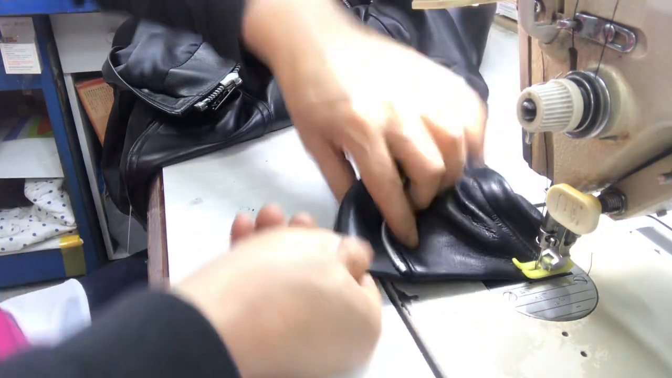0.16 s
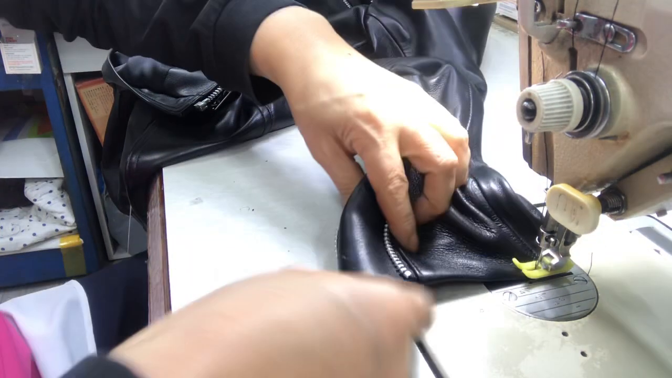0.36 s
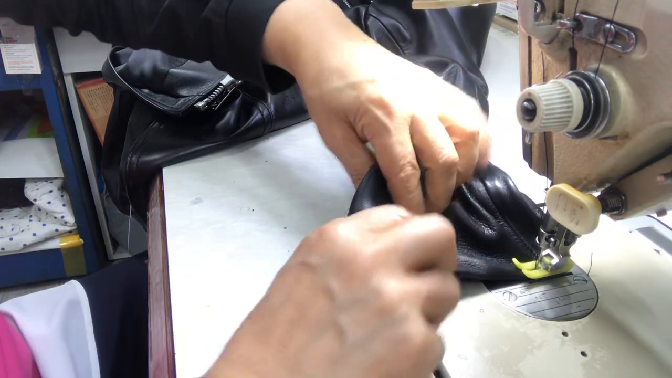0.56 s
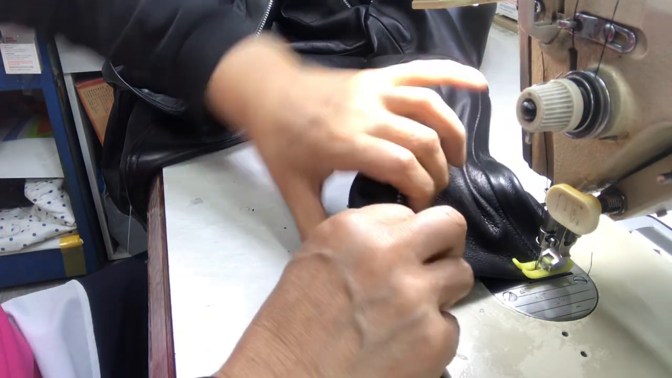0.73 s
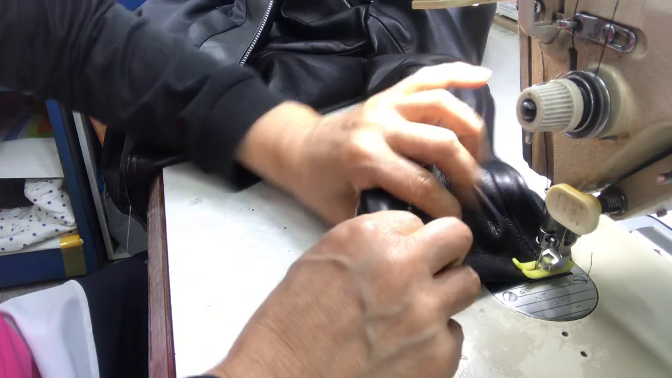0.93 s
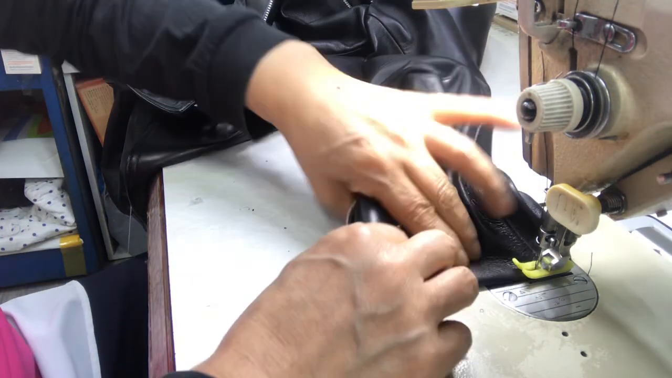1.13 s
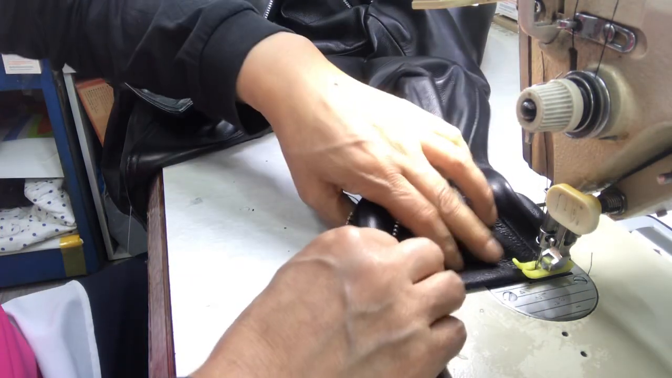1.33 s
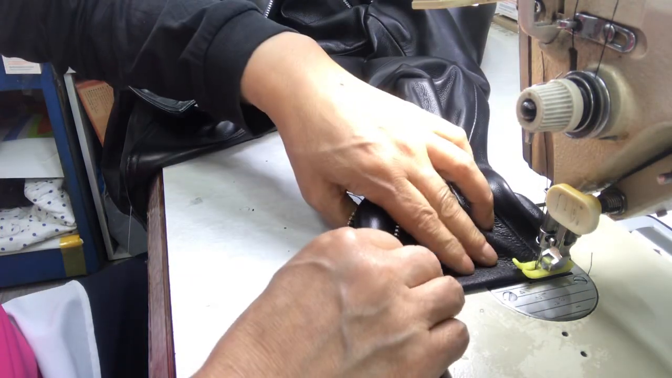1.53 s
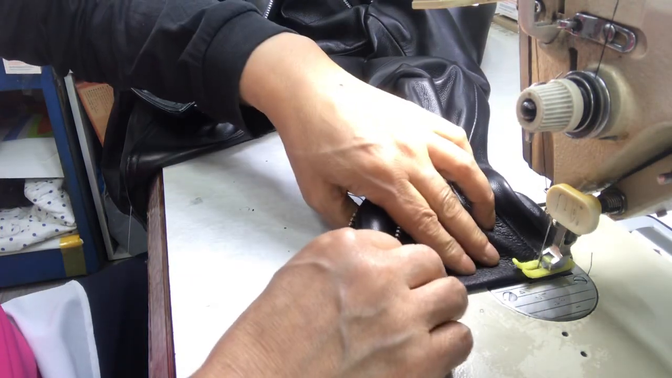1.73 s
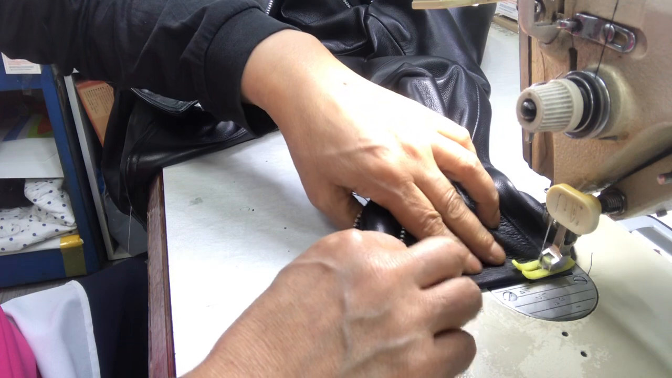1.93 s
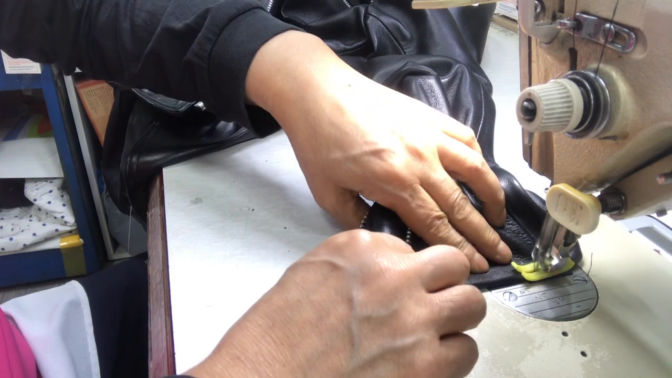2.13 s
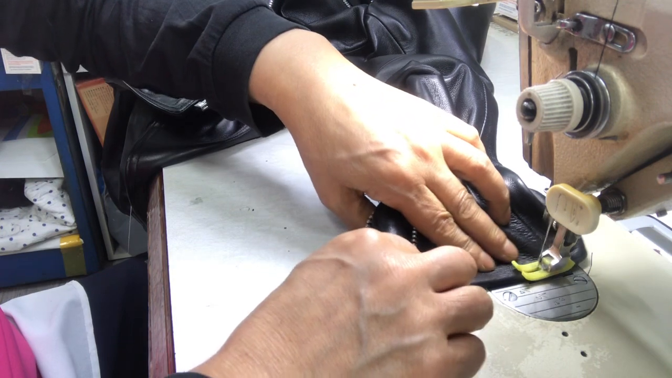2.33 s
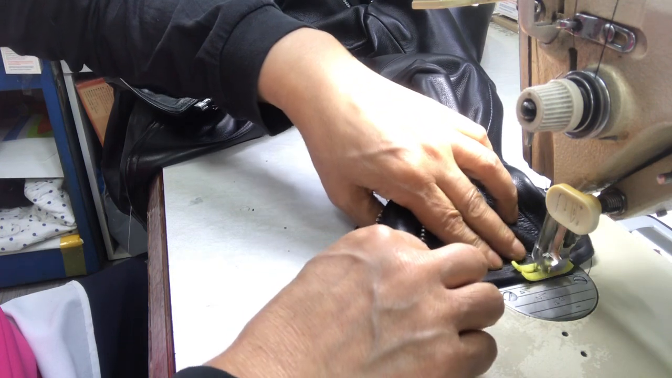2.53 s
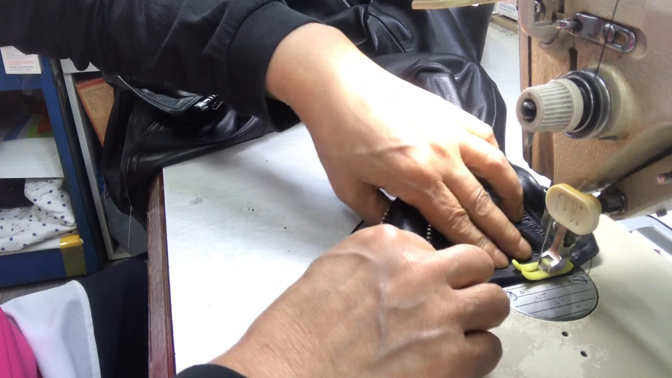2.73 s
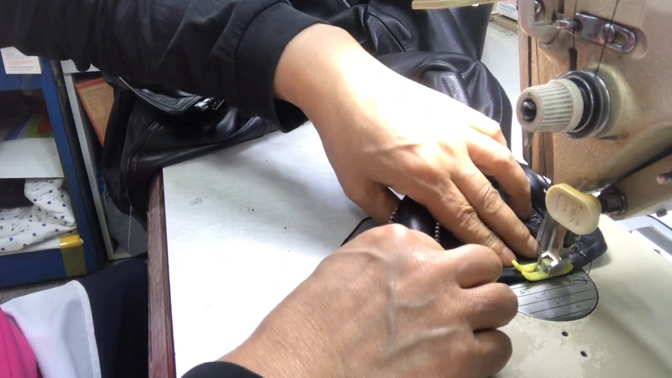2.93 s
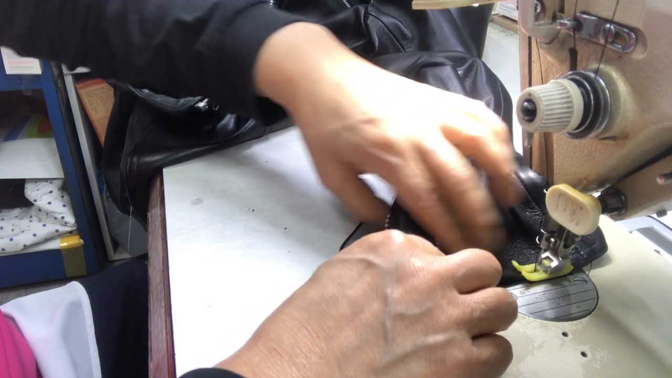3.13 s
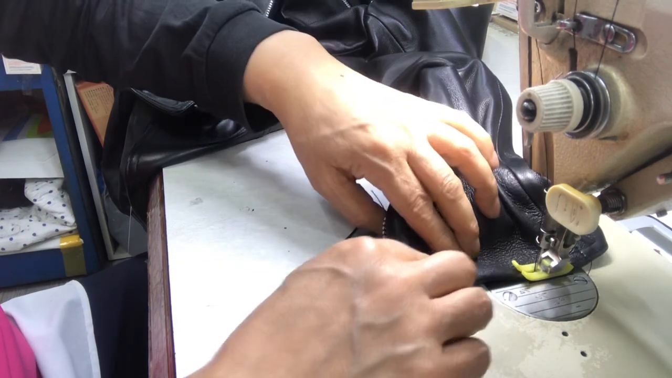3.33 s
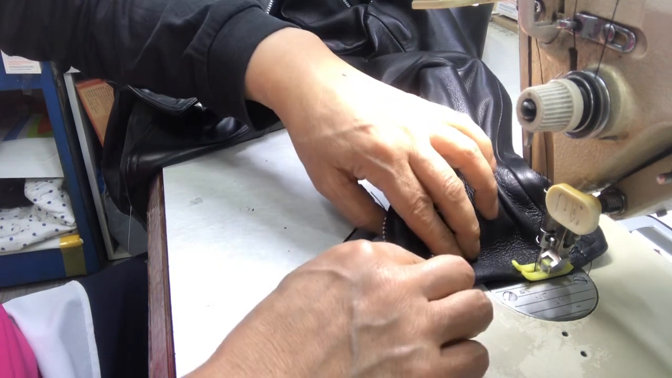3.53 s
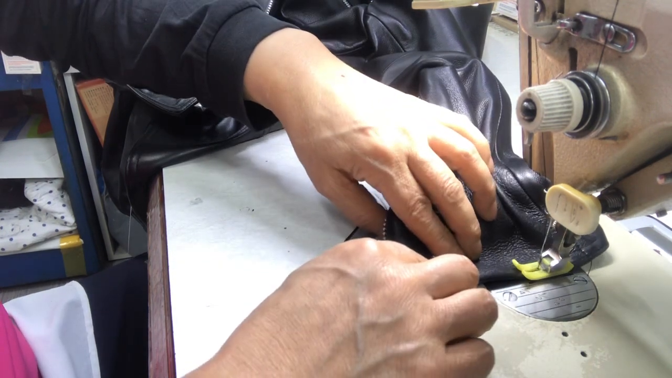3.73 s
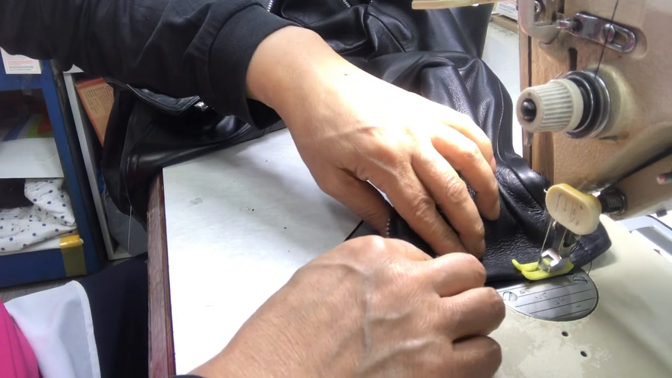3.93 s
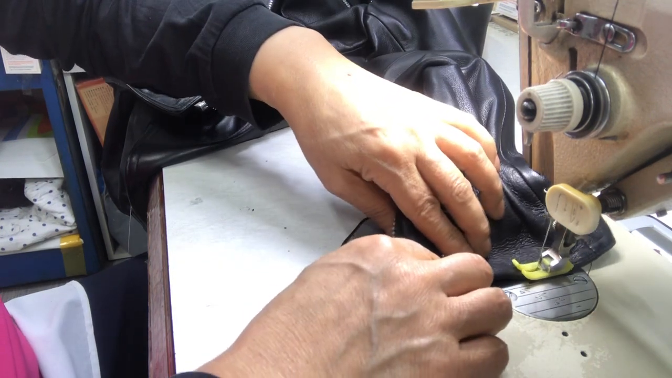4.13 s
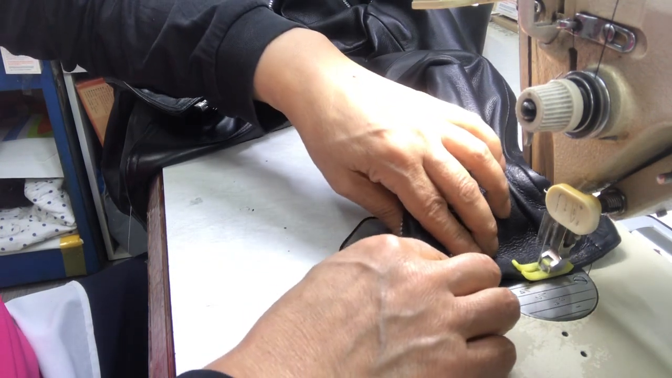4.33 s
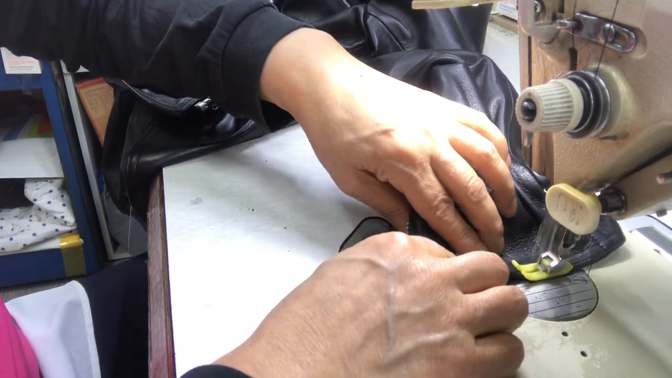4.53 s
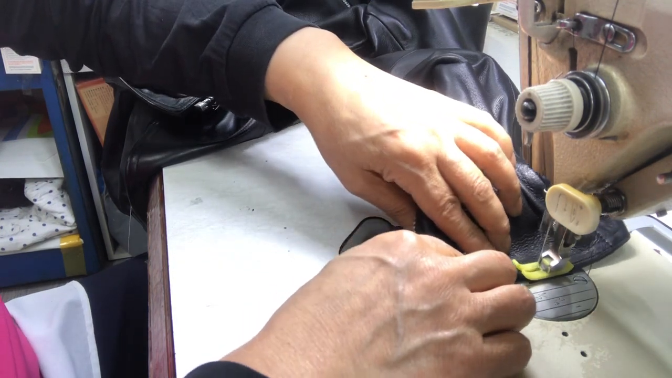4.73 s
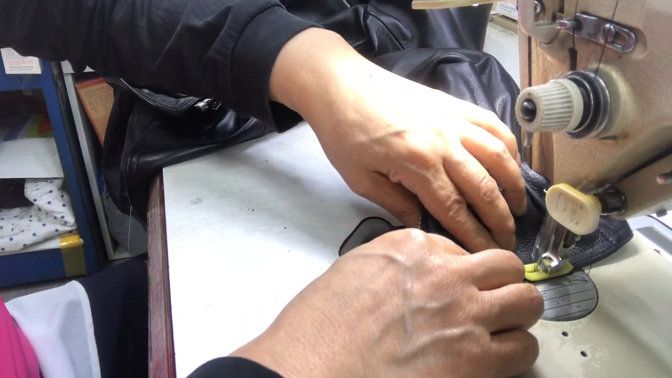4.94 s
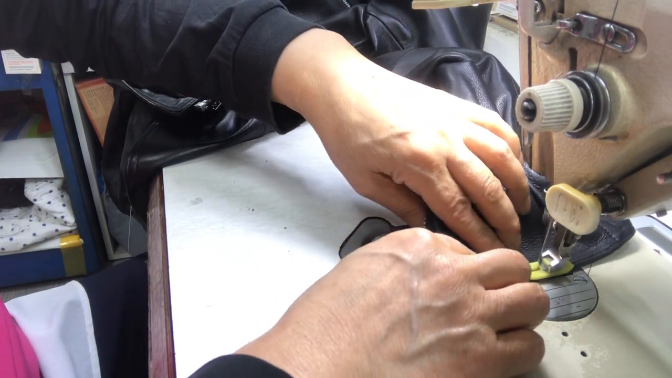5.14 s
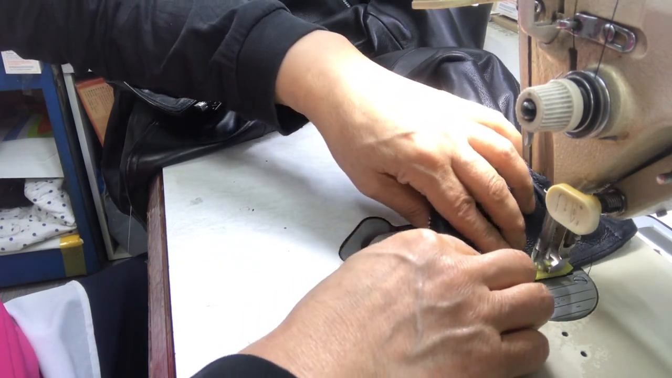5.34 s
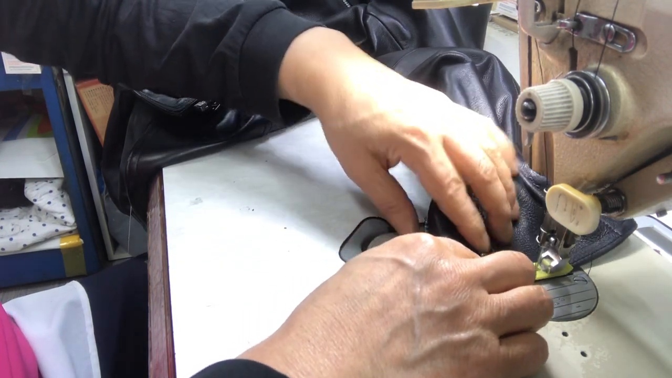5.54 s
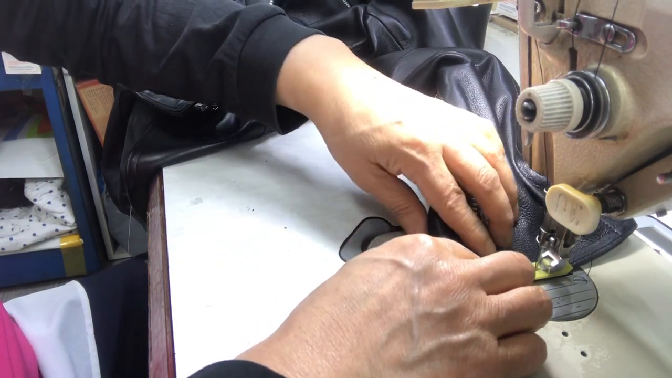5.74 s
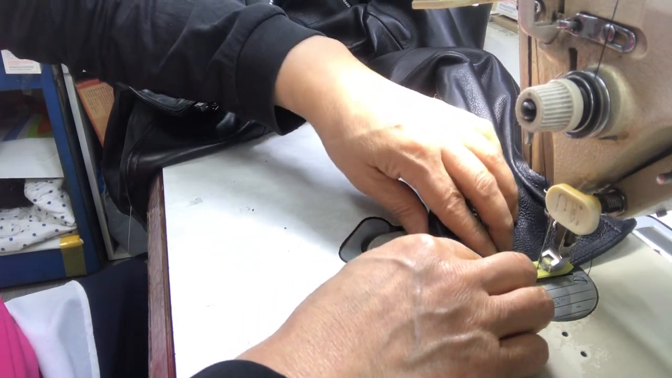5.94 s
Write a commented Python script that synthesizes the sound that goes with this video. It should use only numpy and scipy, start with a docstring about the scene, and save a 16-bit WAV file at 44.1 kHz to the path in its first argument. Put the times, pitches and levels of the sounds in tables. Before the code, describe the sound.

For the first 1.7 seconds, thick leather is handled close by, with soft rustling and irregular crackles, the sharpest near 0.9 seconds. At 1.7 a clutch clicks and an industrial sewing machine starts. From 1.9 to 3.1 it makes nine loud stitches, quickly reaching about seven a second. Each joins a low table thump, a ringing metallic clack and a bright rattle, over a faint gear whirr. It stops with a tiny brake squeak, light clunks and ticks. The leather rustles quietly, then the clutch clicks again at 3.7. A second run of eleven stitches lasts from 3.9 to 5.4, starting slower and speeding up, and ends with another faint squeak and ticks. A little rustling follows, with a last clutch click near 5.9. A low workshop rumble lies underneath throughout, and the reverberation is short and dull.

```python
"""An industrial sewing machine makes two short runs through thick leather, heard close by in a workshop.
Each stitch is a series of impacts: the table thumps, needle and foot excite the modes of the casting,
the hook rattles and small parts tick. The clutch clicks in, the gears whirr, and brake friction squeaks.
Handled leather crackles and rustles; behind it lie a short reverberation and a low room rumble."""
import sys
import numpy as np
from scipy import signal
from scipy.fft import rfft, irfft, next_fast_len
from scipy.io import wavfile
from scipy.ndimage import map_coordinates

SR = 44100
rng = np.random.default_rng(int(sys.argv[2]) if len(sys.argv) > 2 else 0)


def store_wav(level_fs):
    """Save 16-bit WAV to argv[1]."""
    pcm = np.round(np.clip(np.atleast_2d(level_fs), -1, 1) * 32767)
    wavfile.write(sys.argv[1], SR, pcm.T.astype(np.int16))


N = 263718

# stitches, one list per run: (hook time [s], thump time [s], foot time [s], feed level [dB],
# hook level [dB], take-up level [dB], thump level [dB], needle level [dB], foot level [dB])
STITCH_RUNS = [
    [(1.8577, 1.9231, 1.9651, -23, -20, -19, -28, -20, -17.5),
     (2.034, 2.0877, 2.1141, -35, -34, -21, -21, -17.5, -14),
     (2.177, 2.2244, 2.2487, -45, -16, -17.5, -20, -23.5, -15),
     (2.3117, 2.361, 2.385, -30, -15.5, -18.5, -20.7, -24, -16),
     (2.451, 2.4979, 2.5219, -28, -15.5, -22, -21, -19.5, -15),
     (2.5878, 2.636, 2.6589, -32, -17, -18, -22.5, -24, -15.5),
     (2.724, 2.771, 2.796, -26, -16, -18.5, -22, -24.5, -15),
     (2.8604, 2.908, 2.9326, -31, -15, -23, -21.5, -21.5, -15.5),
     (2.9964, 3.0766, 3.0828, -47, -16.5, -20.5, -32, -55, -18.5)],
    [(3.8585, 3.9298, 3.9725, -29, -18.5, -23.5, -29, -26.5, -20.5),
     (4.063, 4.122, 4.1613, -24, -16.5, -21, -28, -61, -21.5),
     (4.249, 4.297, 4.34, -23.5, -17, -21.5, -27, -35, -19.5),
     (4.416, 4.466, 4.4919, -24, -16.5, -16.5, -23, -29.5, -14.5),
     (4.555, 4.604, 4.6292, -23, -18, -21, -23, -23, -16.5),
     (4.6946, 4.7414, 4.767, -45, -14.5, -17.5, -23.3, -26.5, -14),
     (4.831, 4.8782, 4.9015, -31, -17.5, -20.5, -23.4, -22.5, -14),
     (4.9666, 5.0145, 5.039, -32, -16.5, -21, -23, -23, -14),
     (5.1045, 5.1511, 5.1749, -23.5, -18, -18, -23, -24, -16),
     (5.2406, 5.2885, 5.3133, -26, -17.5, -20, -22.5, -16.5, -14),
     (5.3792, 5.4197, 5.4131, -26, -15.5, -45, -28.5, -60, -23.5)],
]
FEED_AT = .65  # share of the way from the previous foot contact to the hook
TAKEUP_AT, NEEDLE_AT = .41, .753  # shares of the way from hook to foot
WINDUP_S = 0.22  # the shaft creeps this long before a run's first hook

def stitches():
    """Kinematic linkage: one shaft times every contact. Gives (time [s], level [dB]) for each part."""
    hook_s, thump_s, foot_s, *levels = np.transpose(np.concatenate(STITCH_RUNS))
    start_s = np.concatenate([np.r_[run[0][0] - WINDUP_S, np.transpose(run)[2][:-1]]
                              for run in STITCH_RUNS])
    feed_s = start_s + FEED_AT * (hook_s - start_s)
    takeup_s = hook_s + TAKEUP_AT * (foot_s - hook_s)
    needle_s = hook_s + NEEDLE_AT * (foot_s - hook_s)
    times = dict(feed=feed_s, hook=hook_s, takeup=takeup_s, thump=thump_s, needle=needle_s, foot=foot_s)
    return {part: np.array([s, db]) for (part, s), db in zip(times.items(), levels)}


def brake_damping(last_db=-9.5):
    """Damping: the brake weakens the ring of each run's last stitch. Gives a gain [dB] per stitch."""
    return np.concatenate([last_db * (np.arange(len(run)) == len(run) - 1) for run in STITCH_RUNS])


def table_thumps():
    """Forced vibration: the table swings, longer when hit harder, and recoils as the foot lands."""
    track, parts = np.zeros(N), stitches()
    t = np.arange(-SR // 25, SR // 25) / SR
    for s, db in parts["thump"].T:
        width = np.where(t < 0, .0085, .0095) * amp(.4 * (db + 16))
        envelope = np.exp(-np.abs(t / width) ** 1.73 / 2)
        add(track, s + t[0], amp(db - 1.7) * envelope * np.cos(2 * np.pi * 131 * t))
    recoil = -np.exp(-(t / np.where(t < 0, .004, .014)) ** 2 / 2) * np.cos(2 * np.pi * 128 * t)
    recoil_delay_s, recoil_db = 0.0066, -14.5
    for (s, db), damping_db in zip(parts["foot"].T, brake_damping()):
        add(track, s + recoil_delay_s + t[0], amp(db + recoil_db + damping_db) * recoil)
    return track


# modes of casting and table: (frequency [Hz], level [dB], T60 [s], rise time [s])
BODY_MODES = [(245.4, 4.5, 0.078, 0.0039), (353.9, 7.5, 0.088, 0.0073), (461.6, 6, 0.048, 0.0046),
              (577.8, 0, 0.09, 0.0024), (619.6, 2.5, 0.066, 0.0013), (697.6, 0, 0.051, 0.0015),
              (737, -6.5, 0.043, 0.00096), (1057, -6, 0.056, 0.00065), (1252, -12, 0.081, 0.0018),
              (1380, -0.5, 0.023, 0.00099), (1598, -4.5, 0.057, 0.00068), (1943, -9.5, 0.079, 0.0013),
              (2054, -8.5, 0.086, 0.0012), (2146, -11.5, 0.086, 0.00067), (2670, -13, 0.06, 0.0017)]
# spectrum of a blow's crack: (frequency [Hz], level [dB])
CRACK_SPECTRUM = [(700, -3.5), (1300, 4.5), (2200, -1.5), (4000, 0.5), (6300, -2.5), (9000, -17.5),
                  (12000, -19.5), (14000, -24.5), (16000, -31)]
RING_FOLLOWS = 0.32  # dB of low-mode ring per dB of blow

def needle_and_foot():
    """Impact excitation: a blow cracks and rings the head; the lower bed and table modes build later."""
    track, parts = np.zeros(N), stitches()
    hz, mode_db, t60, rise = np.transpose(BODY_MODES)
    for part, usual_db, bed_db, table_db in [("needle", -23, -32.5, -37), ("foot", -15, -30, -31)]:
        for (s, db), damping_db in zip(parts[part].T, brake_damping()):
            low_db = RING_FOLLOWS * (db - usual_db) + damping_db
            head_db = db - 12.5
            drive_db = np.select([hz < 450, hz < 700], [table_db + low_db, bed_db + low_db], head_db)
            add(track, s, ring(hz, mode_db + drive_db, t60, rise))
    s, db = np.hstack([parts["needle"], parts["foot"]])
    crack = strokes(s, db - 8.5, rise=0.00037, t60=0.035)
    tail = strokes(s, db - 27.5, rise=0.0016, t60=0.09)
    return track + (crack + tail) * noise(CRACK_SPECTRUM)


# spectrum of the hook's rattle: (frequency [Hz], level [dB])
RATTLE_SPECTRUM = [(300, 4), (1000, -0.5), (2200, 6), (4000, 8), (6000, 3), (9000, 0), (16000, -17)]

def hook():
    """Friction and chatter: the hook scrapes in, takes the thread and rattles on."""
    s, db = stitches()["hook"]
    scrape = strokes(s, db - 24.5, rise=0.0013, t60=0.083, lead=0.0069)
    catch = strokes(s, db - 17, rise=0.0018, t60=0.048)
    return (scrape + catch) * amp(1.53 * wobble(600)) * noise(RATTLE_SPECTRUM)


# loose parts ticking as the machine starts and stops: (time [s], level [dB], T60 [s])
LOOSE_TICKS = [(1.721, -28.5, 0.024), (1.7486, -17.5, 0.027), (1.7754, -39, 0.1), (1.842, -30, 0.045),
               (1.8495, -20, 0.038), (3.045, -17.5, .035), (3.0994, -42, 0.082), (3.117, -32, 0.048),
               (3.126, -27, 0.022), (3.1612, -37, 0.025), (3.173, -36, 0.04), (3.1978, -36, 0.031),
               (3.206, -35, 0.049), (3.638, -35, 0.092), (3.774, -30.5, 0.15), (3.8267, -37, 0.088),
               (3.8493, -22, 0.026), (4.3098, -24, 0.067), (5.445, -24.5, 0.051), (5.472, -27.5, 0.17),
               (5.497, -29, 0.062), (5.5485, -27.5, 0.013)]
# spectrum of a light contact: (frequency [Hz], level [dB])
TICK_SPECTRUM = [(1200, -38), (2600, -7), (4000, 7), (6000, 3), (8000, -4.5), (12000, -8.5), (16000, -20.5)]

def ticks():
    """Light impacts: loose parts, feed and take-up each radiate a bright burst over a duller one."""
    parts = stitches()
    # (time [s], level [dB], dull offset [dB], T60 [s])
    rows = [(s, db, -4.5, t60) for s, db, t60 in LOOSE_TICKS]
    rows += [(s, db, -2.3, 0.044) for s, db in parts["feed"].T]
    rows += [(s, db, -8.5, 0.087) for s, db in parts["takeup"].T]
    s, db, dull_db, t60 = np.transpose(rows)
    dull = noise([(400, -19), (900, -6), (2200, -0.5), (3500, -29)])
    bright = strokes(s, db - 17, rise=0.00041, t60=t60) * amp(3.3 * wobble(700)) * noise(TICK_SPECTRUM)
    return bright + strokes(s, db + dull_db - 13, rise=0.0005, t60=t60) * dull


# spectrum of steel striking steel: (frequency [Hz], level [dB])
SNAP_SPECTRUM = [(3000, -40), (6300, -6), (8500, 11.5), (11000, 0), (14000, 10), (16000, 2)]

def steel_snaps():
    """Hard contact: steel meets steel so briefly that each impact reaches the high treble."""
    parts = stitches()
    contacts = [parts[part] for part in ("feed", "hook", "takeup", "needle", "foot")]
    s, db = np.hstack(contacts + [np.transpose(LOOSE_TICKS)[:2], np.transpose(CLUTCH_CLICKS)])
    scatter_db = rng.normal(0, 4.8, len(s))
    return strokes(s, db - 22 + scatter_db, rise=0.00016, t60=0.021) * noise(SNAP_SPECTRUM)


# clutch engagements: (time [s], level [dB])
CLUTCH_CLICKS = [(1.733, -21.5), (3.732, -20.5), (5.9349, -23)]
# modes of the clutch lever: (frequency [Hz], level [dB], T60 [s])
LEVER_MODES = [(1030, -3, .04), (1660, -8, .03), (2185, -3, .045), (3360, -3, .025), (3780, -3, .025),
               (4200, 0, .03), (4460, -3, .025), (5030, -4, .02), (6460, -4, .02), (6750, -6, .02),
               (8770, -6, .012)]

def clutch():
    """Free vibration: the lever snaps over with a click and its modes ring briefly."""
    track = np.zeros(N)
    hz, mode_db, t60 = np.transpose(LEVER_MODES)
    for s, db in CLUTCH_CLICKS:
        add(track, s, ring(hz, mode_db + db - 11, t60, rise=0.0002, scatter_db=4.5))
    s, db = np.transpose(CLUTCH_CLICKS)
    return track + strokes(s, db - 6, rise=0.00041, t60=0.045) * noise(TICK_SPECTRUM)


# handwheel clunks: (time [s], frequency [Hz], level [dB], T60 [s])
WHEEL_CLUNKS = [(3.028, 990, -38, 0.045), (3.063, 432, -33.5, 0.05), (3.084, 1080, -29.5, 0.033),
                (3.218, 1060, -43.5, 0.029), (5.418, 1088, -43, 0.075), (5.48, 305, -42.5, 0.08),
                (5.49, 450, -38, 0.034)]

def handwheel():
    """Damped oscillation: as the brake bites, each clunk of the wheel rings one dull mode."""
    track = np.zeros(N)
    for s, hz, db, t60 in WHEEL_CLUNKS:
        add(track, s, ring(np.array([hz]), db + 6, t60, rise=0.00088))
    return track


# brake squeaks: (time [s], duration [s], frequency [Hz], level [dB])
BRAKE_SQUEAKS = [(3.01, 0.032, 1920, -38), (3.069, 0.03, 1955, -48), (5.4, 0.044, 1936, -39.5)]

def brake():
    """Friction-driven oscillation: the rubbing brake sustains a tone of slightly unsteady level."""
    track = np.zeros(N)
    for s, length, hz, db in BRAKE_SQUEAKS:
        t = np.arange(int(length * SR)) / SR
        envelope = np.sin(np.pi * t / length) ** 0.25
        add(track, s, amp(db) * envelope * np.sin(2 * np.pi * hz * t))
    return track * amp(1.7 * wobble(130))


# running gear, one curve per clutch engagement: (time [s], level [dB])
GEAR_LEVELS = [
    [(1.733, -53), (1.79, -58), (1.915, -53), (2.02, -48.5), (2.95, -51), (3.109, -44), (3.2, -90)],
    [(3.733, -55.5), (3.9, -54.5), (4.27, -55), (4.5, -49), (5.297, -51.5), (5.381, -48.5), (5.529, -55),
     (5.62, -78)],
    [(5.936, -48), (5.98, -58)],
]
# spectrum of shafts and belt: (frequency [Hz], level [dB])
WHIRR_SPECTRUM = [(1500, -54), (2600, -2), (4000, 2.5), (6000, -1.5), (8000, -10), (16000, -22.5)]

def running_gear():
    """Structure-borne sound: shafts and belt whirr and drone in the casting, which the hook shakes too."""
    whirr = noise(WHIRR_SPECTRUM) * amp(2.5 * wobble(70) + 1.5 * wobble(400))
    drone = casting() * amp(3.5 + 2 * wobble(60))
    s, db = stitches()["hook"]
    shaken = strokes(s, db - 27.5, rise=0.0036, t60=0.061, lead=0.004) * casting()
    running = sum(curves(run)[0] for run in GEAR_LEVELS)
    return shaken + running * (whirr + drone)


# gearbox resonances: (frequency [Hz], bandwidth [Hz], level [dB])
GEARBOX_MODES = [(132, 32, 6.5), (267, 31, 5.5), (328, 16, -3), (414, 57, -4.5), (599, 60, 1.5),
                 (1000, 114, -2.5), (1250, 230, -4.5), (1570, 150, -2), (1928, 63, 1.5), (2027, 80, 3.5),
                 (2270, 170, -4)]

def casting():
    """Resonant filtering: gearbox modes of alternating sign colour a noise, returned at rms 1."""
    def response(f):
        return sum((-1) ** k * amp(db) * resonance(f, hz, width)
                   for k, (hz, width, db) in enumerate(GEARBOX_MODES))
    return shaped_noise(N, response)


# the louder leather crackles: (time [s], level [dB], frequency [Hz])
LEATHER_CREASES = [(0.1945, -36, 1170), (0.2927, -41, 1390), (0.2996, -36, 1480), (0.3285, -31.5, 1250),
                   (0.3583, -34, 1060), (0.3947, -35, 1110), (0.415, -29.5, 3840), (0.457, -34.5, 3720),
                   (0.5048, -30, 1270), (0.532, -35.5, 1310), (0.5606, -34, 3730), (0.6288, -33, 1830),
                   (0.675, -38, 1750), (0.7045, -43, 1910), (0.9057, -35, 1910), (0.9255, -40, 4020),
                   (0.9313, -25.5, 3850), (0.9355, -32, 3970), (0.9417, -33, 3560), (0.9516, -32, 1220),
                   (1.1947, -38, 1490), (1.2443, -37, 1490), (1.2507, -33, 1600), (1.284, -34.5, 2220),
                   (1.3125, -32, 1280), (1.3975, -42, 1590), (1.4207, -34.5, 1320), (1.4619, -30.5, 1370),
                   (1.4876, -34.5, 1430), (1.513, -36.5, 2880), (1.5441, -36.5, 1570), (1.6075, -37, 1530),
                   (3.2908, -40, 2330), (3.3044, -40, 1010), (3.329, -40, 1590), (3.4501, -41, 1540)]
# leather sliding under the hands: (time [s], rustle level [dB], fizz level [dB])
SLIDE_LEVELS = [(0, -61, -60.5), (.19, -65, -61.5), (.29, -60.5, -59.5), (.53, -67.5, -65.5),
                (.71, -62.5, -61), (.88, -68, -68.5), (.99, -58.5, -59.5), (1.12, -68, -65.5),
                (1.25, -61, -63.5), (1.39, -64, -67.5), (1.5, -63.5, -64.5), (1.72, -69, -70.5),
                (3.17, -62, -63.5), (3.4, -65.5, -64), (3.5, -68, -66.5), (3.72, -65, -67),
                (5.58, -58, -63), (5.7, -68.5, -69.5), (5.98, -61.5, -66.5)]
# spectra of the sliding, midrange and treble: (frequency [Hz], level [dB])
RUSTLE_SPECTRUM = [(290, -34), (500, -27), (590, -7.5), (839, -2), (1320, 1.5), (2600, -7.5), (3380, -42),
                   (5720, -120)]
FIZZ_SPECTRUM = [(1530, -31), (2600, -4.5), (3950, -2), (4890, -7.5), (5310, -3), (6140, -6), (10500, -16),
                 (12300, -13.5), (16000, -17.5)]
CREASE_T60_S, FAINT_COUNT, FAINT_HZ = 0.022, 60, 1500

def leather():
    """Buckling and friction: creases snap in bright-edged bursts over a grainy rustle and fizz."""
    snaps, t = np.zeros(N), np.arange(SR // 25) / SR
    when, size, pitch = rng.random((FAINT_COUNT, 3)).T  # faint crackles join the louder ones at random
    faint_s = when * N / SR
    faint_db = np.interp(faint_s, *np.transpose(SLIDE_LEVELS)[:2]) + 14.5 + 8 * size
    faint = np.transpose([faint_s, faint_db, FAINT_HZ * 2 ** (pitch - .5)])
    creases = np.vstack([LEATHER_CREASES, faint])
    for s, db, hz in creases:
        burst = shaped_noise(len(t), lambda f: resonance(f, hz, 0.78 * hz) ** 2)
        add(snaps, s, amp(db - 10 - 60 * t / CREASE_T60_S) * burst)
    s, db, _ = creases.T
    edge_db = db - 13 + 3 * rng.standard_normal(len(s))
    edge = strokes(s, edge_db, rise=0.00026, t60=.5 * CREASE_T60_S)
    edge *= noise([(1500, -11), (3800, 13), (6500, 8.5), (10000, -6.5), (16000, 2)])
    rustle, fizz = curves(SLIDE_LEVELS)
    slips = wobble(250)  # rustle and fizz follow the same small slips
    rustle *= amp(1.5 * wobble(30) + 1.7 * slips) * noise(RUSTLE_SPECTRUM)
    fizz *= amp(1.6 * wobble(35) + 1.34 * slips) * noise(FIZZ_SPECTRUM)
    return snaps + edge + rustle + fizz


# creaks and scrapes of the leather: (time [s], duration [s], frequency [Hz], level [dB])
FOLD_SCRAPES = [(0.458, 0.014, 3800, -55), (0.907, 0.046, 4330, -44), (0.914, 0.038, 16000, -55),
                (1.638, 0.042, 1500, -61), (1.634, 0.035, 3720, -56)]

def leather_scrapes():
    """Sliding friction: the folded leather gives narrow-band noise that crests late in each scrape."""
    track = np.zeros(N)
    for s, length, hz, db in FOLD_SCRAPES:
        t = np.arange(int(length * SR)) / SR
        swell = np.sin(np.pi * (t / length) ** 1.55)
        add(track, s, amp(db) * swell * shaped_noise(len(t), lambda f: resonance(f, hz, 0.19 * hz)))
    return track


def walls(x, t60=.3, delay_samples=400):
    """Reverberation: the workshop returns a short, dull tail that decays exponentially."""
    t = np.arange(SR // 3) / SR
    tail = shaped_noise(len(t), lambda hz: (hz > 200) / (1 + hz / 4000)) * amp(-60 * t / t60)
    return signal.fftconvolve(np.pad(x, (delay_samples, 0)), tail / np.linalg.norm(tail))[:N]


# course of the room rumble: (time [s], level [dB])
RUMBLE_LEVELS = [(0, -59), (.6, -58), (1.6, -57.5), (1.75, -51.5), (2.7, -52), (3.15, -54), (3.5, -58),
                 (4.3, -47.5), (4.6, -50.5), (5.46, -51), (5.8, -58.5), (5.98, -51.5)]
# its spectrum: (frequency [Hz], level [dB])
RUMBLE_SPECTRUM = [(12, -55), (20, -19), (30, -39), (53, 2.5), (81, -7.5), (155, -14), (255, -14),
                   (282, -13.5), (600, -23), (780, -34), (1320, -120)]

def room_rumble():
    """Ambient noise: a low rumble, randomly modulated in amplitude, fills the workshop."""
    return curves(RUMBLE_LEVELS)[0] * amp(1.55 * wobble(10)) * noise(RUMBLE_SPECTRUM)


def amp(db):
    """Decibel law: the amplitude ratio of a level."""
    return 10 ** (np.asarray(db) / 20)


def resonance(f, hz, width):
    """Second-order resonance: a band-pass response with centre and bandwidth in Hz."""
    return 1j * f * width / (hz * hz - f * f + 1j * f * width)


def colour(spectrum):
    """Spectral envelope: a response through (frequency [Hz], level [dB]) points, in log frequency."""
    f, db = np.transpose(spectrum)
    return lambda hz: amp(np.interp(np.log(hz + 1), np.log(f), db))


def filtered(x, response):
    """Linear filtering: the spectrum of x is multiplied by a frequency response."""
    size = next_fast_len(len(x) + 8192)
    return irfft(rfft(x, size) * response(np.fft.rfftfreq(size, 1 / SR)), size)[:len(x)]


def shaped_noise(samples, response):
    """Spectral shaping: white noise is filtered, then scaled to rms 1."""
    x = filtered(rng.standard_normal(samples), response)
    return x / np.sqrt(np.mean(x ** 2) + 1e-20)


def noise(spectrum):
    """Stationary noise: the given spectrum at rms 1, as long as the scene."""
    return shaped_noise(N, colour(spectrum))


def wobble(rate):
    """Random modulation: a smooth curve with `rate` knots a second."""
    return map_coordinates(rng.standard_normal(int(N * rate / SR) + 4), [np.arange(N) * rate / SR])


def curves(rows):
    """Level interpolation: a gain per sample for each dB column, silent outside the table."""
    s, *columns = np.transpose(rows)
    return [amp(np.interp(np.arange(N) / SR, s, db, left=-120, right=-120)) for db in columns]


def add(track, s, sound):
    """Superposition: the sound joins the track from time s."""
    part = track[max(round(s * SR), 0):][:len(sound)]
    part += sound[:len(part)]


def strokes(times, levels_db, rise, t60, lead=0):
    """Exponential rise and decay: an envelope with one pulse per event, begun `lead` seconds early."""
    track, t = np.zeros(N), np.arange(SR // 5) / SR
    for s, db, fade in np.broadcast(times, levels_db, t60):
        shape = (1 - np.exp(-t / rise)) * amp(-60 * t / fade)
        add(track, s - lead, amp(db) * shape / shape.max())
    return track


def ring(hz, db, t60, rise, scatter_db=2):
    """Modal summation: one blow rings damped sinusoids, each at a slightly random strength."""
    t = np.arange(SR // 5)[:, None] / SR
    onset = (1 - np.exp(-t / rise)) ** 2
    decay = amp(db + scatter_db * rng.standard_normal(len(hz)) - 60 * t / t60)
    sign = np.where(hz > 700, (-1) ** np.arange(len(hz)), 1)  # high neighbours start in antiphase
    return (onset * decay * sign * np.sin(2 * np.pi * hz * t)).sum(axis=1)


def scene():
    """Superposition: machine, reverberation, leather and room add at one microphone."""
    machine = table_thumps() + needle_and_foot() + hook() + ticks() + steel_snaps()
    machine += clutch() + handwheel() + brake() + running_gear()
    return (machine + amp(-23.5) * walls(machine) + leather() + leather_scrapes() + room_rumble())[None]


# treble response of the microphone: (frequency [Hz], gain [dB])
MIC_RESPONSE = [(3000, 2.5), (4800, -1.5), (6300, 0), (8500, -1), (9700, 1), (10500, -2.5), (11300, 1),
                (14000, -2.5), (16000, 1)]
BASS_CUT_HZ, TOP_HZ, SATURATION = 45, 15950, .3

def record(dry):
    """Transduction: the microphone cuts bass and colours treble; soft clipping and a band limit follow."""
    treble = colour(MIC_RESPONSE)
    x = filtered(dry[0], lambda hz: treble(hz) / np.sqrt(1 + (BASS_CUT_HZ / (hz + 1)) ** 6))
    x = x / (1 + np.abs(x / SATURATION) ** 4) ** (1 / 4)
    return filtered(x, lambda hz: hz < TOP_HZ)[None]


dry = scene()
out = record(dry)
store_wav(out)
```